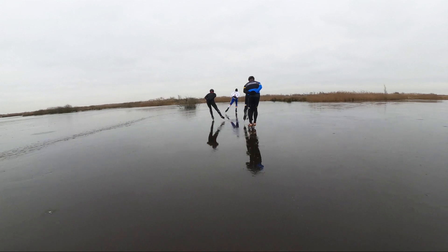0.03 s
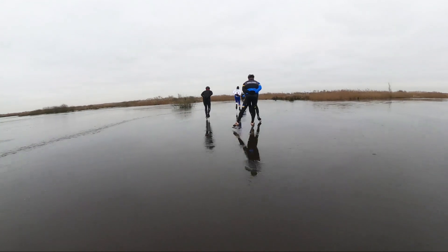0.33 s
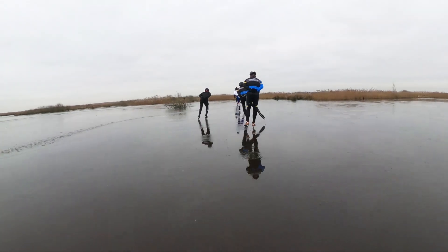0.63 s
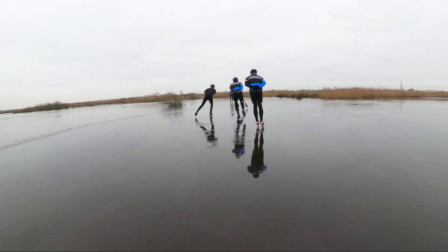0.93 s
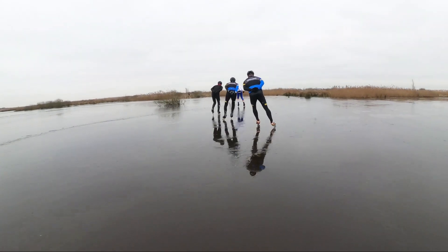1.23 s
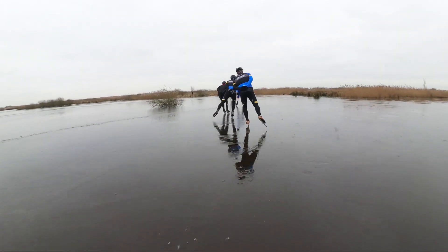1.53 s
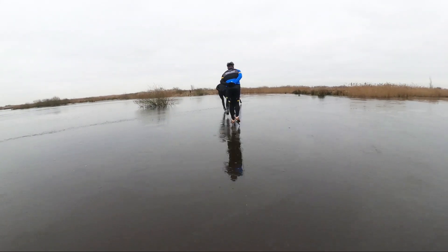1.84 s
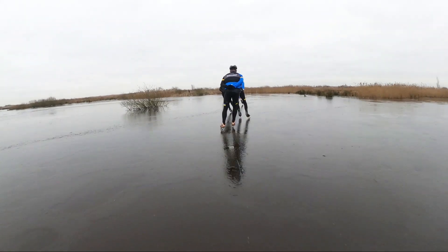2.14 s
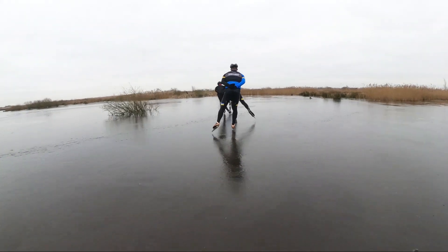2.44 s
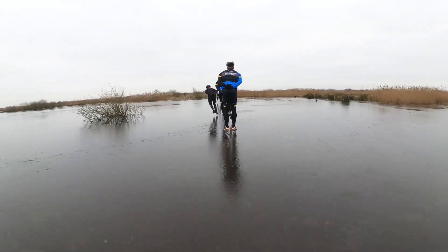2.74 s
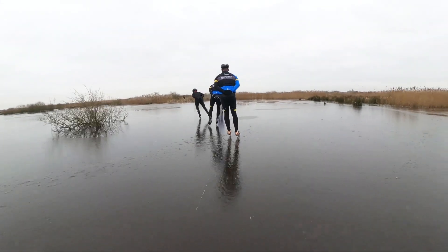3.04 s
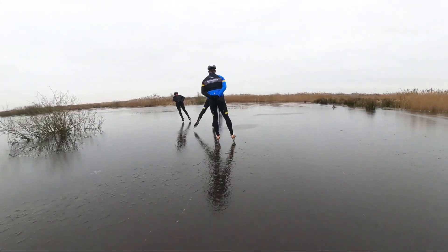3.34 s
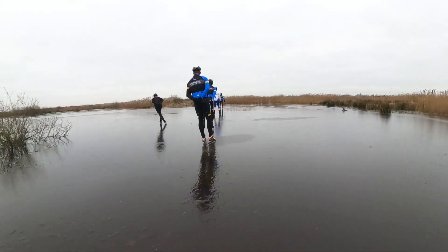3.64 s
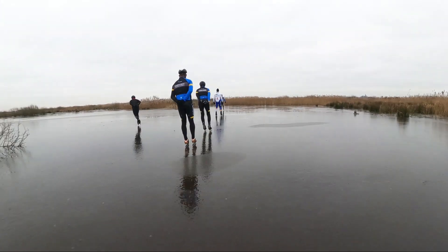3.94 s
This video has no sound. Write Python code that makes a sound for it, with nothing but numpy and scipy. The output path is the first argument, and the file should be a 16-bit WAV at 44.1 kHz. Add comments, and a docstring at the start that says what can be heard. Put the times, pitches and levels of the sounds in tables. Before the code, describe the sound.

Several ice skaters glide over open frozen water, their blades tapping and scraping while the ice sings and wind rumbles on the microphone. The wind then eases and a nearby blade grinds along, ringing louder and brighter.

```python
"""Skaters cross thin natural ice while wind buffets the microphone.
From the start gliding blades hiss and tap; each knock spreads through the sheet as a dispersive bending
wave, treble first, and settles on a note near 500 Hz. From about 1 s edges scrape at the pushes, and
just before 3 s a steel blade rattles. In the last second a close blade bites in: its dense fractures
excite the resonances of skate and ice, and the ringing glide grows louder and brighter."""
import sys
import numpy as np
from scipy import signal
from scipy.fft import rfft, irfft
from scipy.io import wavfile
from scipy.ndimage import uniform_filter1d

SR = 44100
rng = np.random.default_rng(int(sys.argv[2]) if len(sys.argv) > 2 else 0)


def bounce(signal):
    """Save signal as a 16-bit WAV file at the path given by the first command-line argument."""
    frames = np.transpose(np.atleast_2d(signal))
    limited = np.clip(frames, -1, 1)
    pcm = np.round(limited * 32767).astype(np.int16)
    wavfile.write(sys.argv[1], SR, pcm)


N = 176400

# resonance of cracking ice: f/Hz, bandwidth/Hz, level/dB
CRACK_MODES = [(2610, 1960, 0)]


def undb(db):
    """Amplitude ratio of a level: a factor of ten per 20 dB."""
    return 10 ** (np.asarray(db) / 20)


def unit(x):
    """Normalisation to rms 1."""
    return x / np.sqrt(np.mean(x ** 2) + 1e-20)


def curve(rows):
    """Linear interpolation of (t/s, value) rows."""
    return np.interp(np.arange(N) / SR, *np.array(rows).T)


def walk(per_s):
    """Random modulation: smoothed Gaussian steps, rms 1."""
    hold = max(int(SR / per_s), 2)
    steps = rng.standard_normal(N)[np.arange(N) // hold]
    return unit(uniform_filter1d(uniform_filter1d(steps, hold), hold))


def steady(x, span_s):
    """Division by the running rms evens the level and keeps the finer grain."""
    size = max(int(span_s * SR), 8)
    return x / np.sqrt(uniform_filter1d(uniform_filter1d(x * x, size), size) + 1e-12)


def gains(spectrum, hz):
    """Magnitude response: (f/Hz, level/dB) rows interpolated over log frequency."""
    f, db = np.array(spectrum).T
    return undb(np.interp(np.log(hz + 1), np.log(f), db))


def colour(x, spectrum):
    """Zero-phase filtering by (f/Hz, level/dB) rows; rms 1."""
    hz = np.fft.rfftfreq(len(x), 1 / SR)
    return unit(irfft(rfft(x) * gains(spectrum, hz), len(x)))


def ring(x, hz, width):
    """Steep resonance: two equal band-passes in cascade, each of the given width."""
    b, a = signal.iirpeak(min(hz, .45 * SR), hz / width, fs=SR)
    return signal.lfilter(b, a, signal.lfilter(b, a, x + 1e-18))


def resonate(x, modes):
    """Superposition of modes driven by one force."""
    return sum(undb(db) * ring(x, hz, width) for hz, width, db in modes)


def rippled(x, depth_db=4, spacing_hz=110.8):
    """Narrow resonances of blade and boot: a random minimum-phase filter, new for each contact."""
    hz = np.fft.rfftfreq(len(x), 1 / SR)
    db = depth_db * np.interp(hz / spacing_hz, np.arange(len(hz)), rng.standard_normal(len(hz)))
    cepstrum = irfft(db * np.log(10) / 20, len(x))
    cepstrum[len(x) // 2:] = 0  # makes the response causal
    return irfft(rfft(x) * np.exp(2 * rfft(cepstrum)), len(x))


def place(x, start, db, window_s=0.017):
    """A transient at its start time, with the energy of level db held for window_s."""
    x = unit(x) * undb(db) * np.sqrt(window_s * SR / len(x))
    return np.pad(x, (int(start * SR), N))[:N]


def grains(per_s, scatter_db):
    """Shot noise of tiny fractures: random impulses, a few much larger than the rest."""
    size = undb(scatter_db * np.minimum(rng.exponential(size=N), 5))
    return (rng.random(N) < per_s / SR) * size * np.sign(rng.standard_normal(N))


def blow(contact_s):
    """Impact excitation: an impulse and a burst of grit."""
    t = np.arange(SR // 8) / SR
    grit = 1.4 * rng.standard_normal(len(t)) * np.sqrt(t / contact_s) * np.exp(-2 * t / contact_s)
    return rippled(grit + (t == 0))


def sheet(x, note_hz=490, note_delay_s=.004):
    """Dispersion of bending waves: the treble arrives first and the sheet's note last."""
    # response of the ice to a knock: f/Hz, level/dB
    response = [(250, -7.5), (390, -8), (490, 4), (700, -2.5), (850, -7.5), (1400, -15.5), (1900, -32),
                (5000, -63)]
    size = 2 * len(x)
    hz = np.fft.rfftfreq(size, 1 / SR)
    group_delay = note_delay_s * (note_hz / np.maximum(hz, note_hz)) ** 2.6
    phase = 2 * np.pi * np.cumsum(group_delay) * hz[1]
    return irfft(rfft(x, size) * gains(response, hz) * np.exp(-1j * phase))[:len(x)]


def wind():
    """Turbulent pressure on the microphone: a rumble, with brighter buffets in strong gusts."""
    # gust envelope: t/s, level/dB
    gusts = [(.07, -21.5), (.12, -31), (.19, -22), (.3, -21.5), (.41, -15), (.62, -20), (.81, -16),
             (.87, -21), (1.0, -15.5), (1.07, -30), (1.11, -17.5), (1.34, -19), (1.47, -38.5), (1.55, -16),
             (1.6, -34), (1.8, -31.5), (1.86, -17.5), (2.02, -27), (2.16, -14.5), (2.26, -33.5),
             (2.33, -19), (2.68, -21.5), (2.88, -31), (3.1, -27.5), (3.3, -33), (3.46, -26), (4, -30.5)]
    # rumble spectrum: f/Hz, level/dB
    spectrum = [(8, -29), (25, 3.5), (45, -0.5), (80, -4), (120, -8.5), (170, -18.5), (600, -37.5),
                (2000, -75)]
    # Gaussian buffets: peak t/s, half-length/s, level/dB, centre f/Hz
    buffets = [(0.405, 0.042, -25.5, 107), (0.794, 0.017, -19, 179), (1.132, 0.013, -24, 143),
               (1.559, 0.0082, -25, 141), (1.896, 0.054, -22.5, 167), (2.17, 0.016, -17, 240),
               (2.464, 0.18, -31, 153), (2.698, 0.056, -29, 146)]
    t = np.arange(N) / SR
    out = steady(colour(rng.standard_normal(N), spectrum), span_s=0.028) * undb(curve(gusts) + 1)
    for at, half, db, hz in buffets:
        eddies = steady(ring(rng.standard_normal(N), hz, width=1.17 * hz), half)
        out = out + eddies * undb(db) * np.exp(-.5 * ((t - at) / half) ** 2)
    return out


def runner_rumble():
    """Low-frequency noise of the runners moving over the sheet."""
    # rumble envelope: t/s, level/dB
    levels = [(1.6, -49), (3.1, -33.5), (4, -32)]
    # rumble spectrum: f/Hz, level/dB
    spectrum = [(60, -29), (130, -4.5), (220, 3), (450, -5), (2000, -90)]
    return colour(rng.standard_normal(N), spectrum) * undb(curve(levels))


def singing_ice():
    """Random excitation of a plate: countless small knocks keep the sheet ringing."""
    # envelope of the ringing: t/s, level/dB
    levels = [(.07, -33.5), (.7, -30), (.9, -29.5), (1.1, -33), (1.45, -32), (1.8, -25.5), (2.35, -28.5),
              (2.75, -25), (2.92, -34.5), (3.1, -27), (4, -24)]
    knocks = grains(per_s=400, scatter_db=3.5)
    return steady(sheet(knocks), span_s=0.086) * undb(curve(levels) - 4)


def gliding():
    """Filtered shot noise: the blades ahead crumble the surface in an uneven hiss."""
    # hiss envelope: t/s, level/dB
    levels = [(.07, -37.5), (.27, -38.5), (.45, -35), (.55, -41.5), (1.0, -34.5), (1.08, -40), (1.47, -41),
              (1.55, -35.5), (2.2, -37.5), (2.33, -38.5), (2.78, -34.5), (2.83, -39), (2.96, -39),
              (3.1, -31), (4, -58)]
    # hiss spectrum: f/Hz, level/dB
    spectrum = [(400, 12.5), (1000, 13.5), (1800, 5.5), (3600, 2.3), (4400, -4.5), (6200, -6),
                (8000, -12.5), (10000, -22.5), (14500, -47)]
    grit = grains(per_s=5000, scatter_db=2.5) * undb(2.5 * walk(per_s=120))
    return steady(colour(grit, spectrum), span_s=0.069) * undb(curve(levels) - 1)


def ice_chips():
    """Brittle fracture: small chips snap dryly under a blade."""
    # snaps: t/s, level/dB
    snaps = [(.665, -42.5), (1.002, -43), (1.209, -42.5), (1.355, -40), (1.766, -45.5), (2.252, -40.5),
             (2.559, -42.5), (2.788, -40)]
    return sum(place(resonate(blow(contact_s=0.0015), CRACK_MODES), at, db) for at, db in snaps)


def blade_rattle():
    """Repeated impacts excite the bright modes of a steel blade at the end of a push."""
    # impacts: t/s, level/dB
    impacts = [(2.865, -43.5), (2.881, -37.5), (2.899, -40), (2.911, -46.5)]
    # modes of the steel: f/Hz, bandwidth/Hz, level/dB
    modes = [(4130, 1800, 1), (7350, 1000, -3.7)]
    return sum(place(resonate(blow(contact_s=0.0057), modes), at, db) for at, db in impacts)


def ice_notes(mean_hz=522, dive_s=0.00383, decay_s=0.0039):
    """Damped flexural vibration under a skater: each hollow note dives onto its pitch and dies."""
    # notes of the sheet: t/s, level/dB
    notes = [(.191, -30), (.616, -29), (1.64, -24), (1.721, -39), (1.918, -27.5), (2.135, -30),
             (2.595, -33), (2.63, -25), (2.74, -23.5), (3.037, -25.5), (3.102, -22.5), (3.467, -21),
             (3.785, -24.5)]
    t, out = np.arange(SR // 8) / SR, 0
    for start, db in notes:
        settled_hz = mean_hz * (1 + 0.078 * rng.standard_normal())
        hz = settled_hz * (1 + 0.31 * np.exp(-t / dive_s))
        tone = np.sin(2 * np.pi * np.cumsum(hz) / SR)
        out = out + place(tone * t * np.exp(-t / decay_s), start, db)
    return out


def scrapes(attack_s=0.0026, release_s=0.013):
    """Friction noise: an edge shaves the ice at the end of a push."""
    # pushes: t/s, duration/s, level/dB
    pushes = [(0.962, 0.035, -44.5), (1.987, 0.051, -34.5), (2.056, 0.065, -31), (2.641, 0.012, -38),
              (2.69, 0.02, -33), (2.732, 0.052, -41.5)]
    # scrape spectrum: f/Hz, level/dB
    spectrum = [(400, 14), (1000, 20.5), (2100, 9.5), (3800, 10.5), (4800, 0), (6600, 2.5), (8600, -13.5),
                (10000, -19), (14500, -41)]
    t, out = np.arange(N) / SR, 0
    chips = grains(per_s=1300, scatter_db=2)
    for start, length, db in pushes:
        attack = np.clip((t - start) / attack_s, 0, 1)
        release = np.exp(-np.maximum(t - start - length, 0) / release_s)
        shaving = steady(colour(rippled(chips), spectrum), span_s=0.14)
        out = out + undb(db + 5) * attack * release * shaving
    return out


def taps(knock_width_hz=676, cutoff_hz=4500):
    """Impact on a plate: a blade sets down, and one blow drives the sheet's note, a knock and a crack."""
    # impacts: t/s, knock level/dB, knock f/Hz, note level/dB, crack level/dB, contact time/s
    impacts = [(0.099, -45.5, 1120, -29, -43, 0.0061), (0.111, -31.5, 1070, -32, -57, 0.0027),
               (.218, -24.5, 970, -29.5, -36, 0.0036), (.281, -23.5, 870, -27, -24.5, 0.0012),
               (0.324, -46, 1120, -26.5, -32, 0.017), (0.891, -38, 990, -25, -52, 0.0041),
               (0.974, -31, 1150, -32, -41, 0.0066), (0.991, -26, 800, -24, -51, 0.006),
               (1.042, -30, 1160, -28, -56, 0.0025), (1.331, -28.5, 1020, -28, -42, 0.0049),
               (1.362, -27.5, 824, -26, -50.5, 0.0023), (1.871, -31.5, 1230, -37, -33, 0.0044),
               (1.993, -35, 1420, -35, -29, 0.0062), (2.073, -29, 1150, -30.5, -35, 0.0047),
               (2.269, -23.5, 790, -32, -38, .005), (2.321, -22, 830, -39, -40, 0.002),
               (2.667, -22.5, 750, -38, -47, 0.0029), (2.69, -40, 770, -22, -49, 0.015),
               (2.71, -30, 1000, -26, -33, 0.0037), (2.778, -31.5, 970, -21, -48, 0.013),
               (2.88, -27, 1030, -26.5, -43, 0.0026), (3.043, -39, 1170, -26, -39, 0.0054),
               (3.884, -21, 1000, -21, -25, 0.0066)]
    out = 0
    for start, knock_db, knock_hz, note_db, crack_db, contact_s in impacts:
        force = blow(contact_s)
        note = place(sheet(force), start, note_db)
        knock = place(ring(force, knock_hz, knock_width_hz), start, knock_db)
        crack = place(resonate(force, CRACK_MODES), start, crack_db)
        out = out + note + knock + crack
    return signal.sosfilt(signal.butter(10, cutoff_hz, fs=SR, output="sos"), out)


def close_blade(flutter_db=1.07, sway_db=1.8, brighten_per_khz=.075):
    """Forced resonance: dense fractures ring skate and ice, brighter as the blade's pressure grows."""
    # pressure on the ice: t/s, level/dB
    pressure = [(3.03, -66), (3.12, -25.5), (3.2, -23), (3.33, -24.5), (3.44, -18.5), (3.66, -21),
                (3.76, -19), (4, -18.5)]
    # modes of skate and ice: f/Hz, bandwidth/Hz, level/dB
    modes = [(497, 134, 0), (1010, 210, 2.5), (1266, 246, -2.5), (1440, 133, -3.5), (2274, 207, -6),
             (2570, 470, -11.5), (3210, 260, -14), (3680, 660, -12.5), (4180, 860, -18.5),
             (5440, 2650, -27.5), (6470, 1660, -24), (8380, 560, -22), (13200, 2300, -49)]
    pressure_db, body = curve(pressure), 0
    flutter = undb(flutter_db * walk(per_s=70))  # common to all modes
    for hz, width, db in modes:
        tilt_db = brighten_per_khz * hz / 1000 * (pressure_db - pressure_db[-1])
        gain = undb(db + tilt_db + sway_db * walk(per_s=14))
        fractures = flutter * grains(per_s=3000, scatter_db=1.9)
        body = body + gain * ring(fractures, hz, width)
    in_contact = np.arange(N) / SR > pressure[0][0]
    return unit(body) * undb(pressure_db - 6) * in_contact


def scene():
    """Superposition of skates, ice and wind at one microphone."""
    transients = taps() + ice_chips() + blade_rattle() + ice_notes()
    skating = transients + singing_ice() + runner_rumble() + gliding() + scrapes() + close_blade()
    return (skating + wind())[None]


def record(dry, onset_s=0.067, rise_s=0.0012, cutoff_hz=15700):
    """Gating and band limiting: the sound sets in quickly and passes a steep low-pass."""
    opening = np.clip((np.arange(N) / SR - onset_s) / rise_s, 0, 1)
    return signal.sosfilt(signal.ellip(8, .2, 70, cutoff_hz, fs=SR, output="sos"), dry * opening)


dry = scene()
out = record(dry)
bounce(out)
```